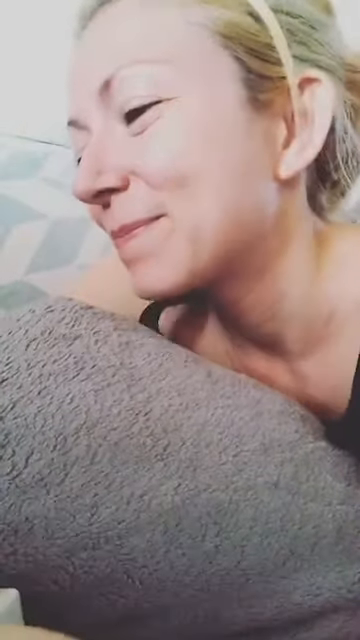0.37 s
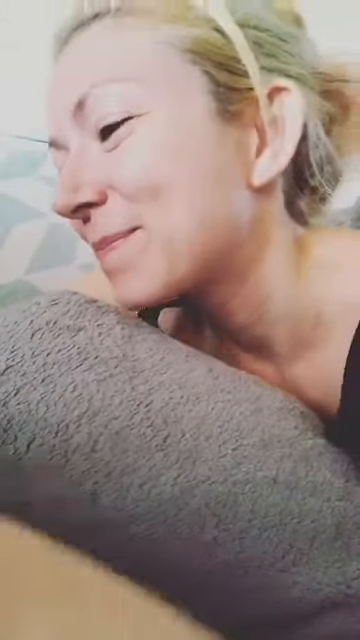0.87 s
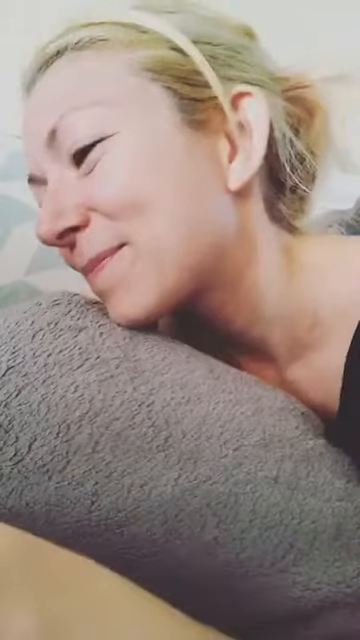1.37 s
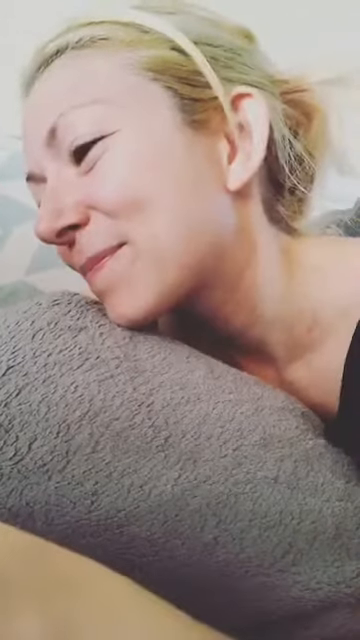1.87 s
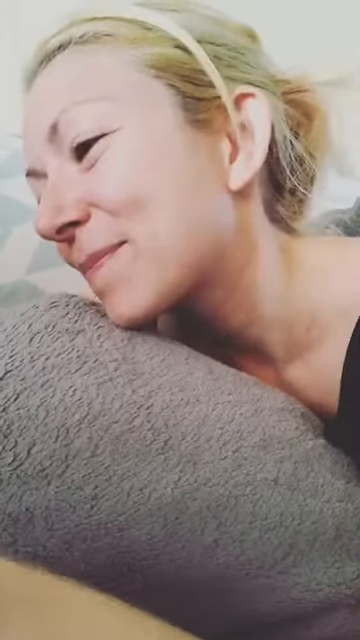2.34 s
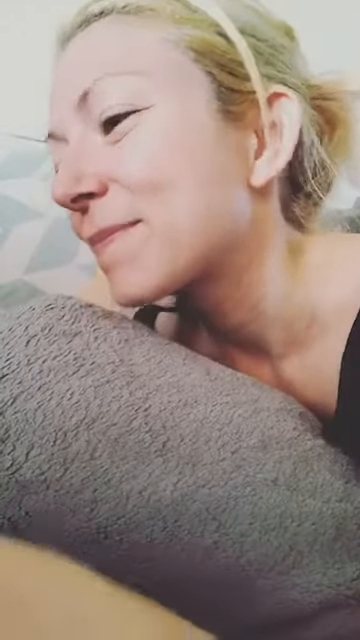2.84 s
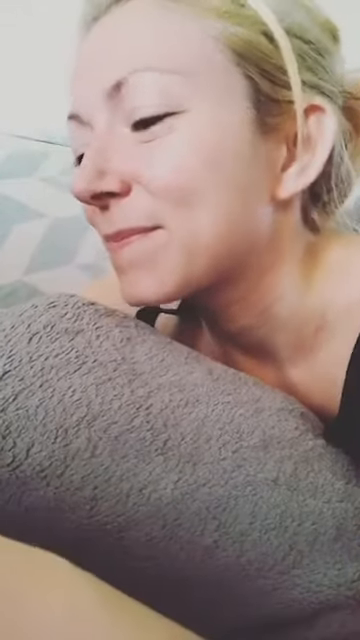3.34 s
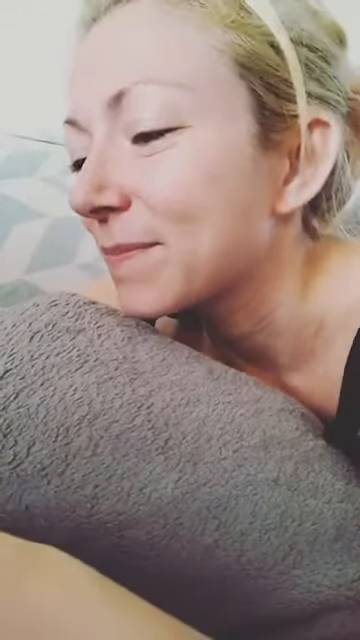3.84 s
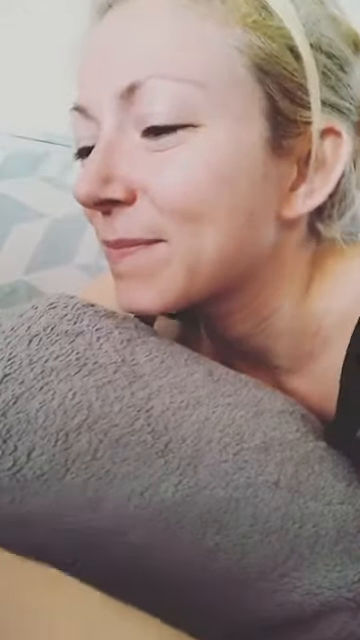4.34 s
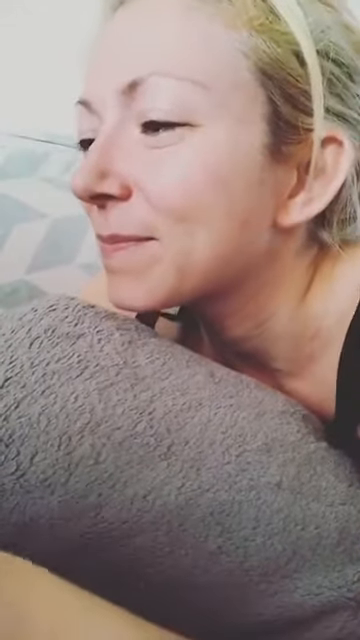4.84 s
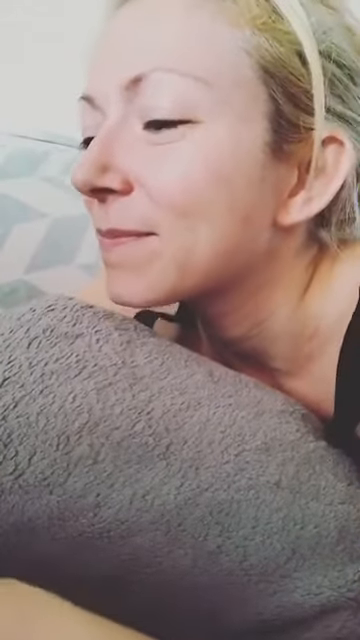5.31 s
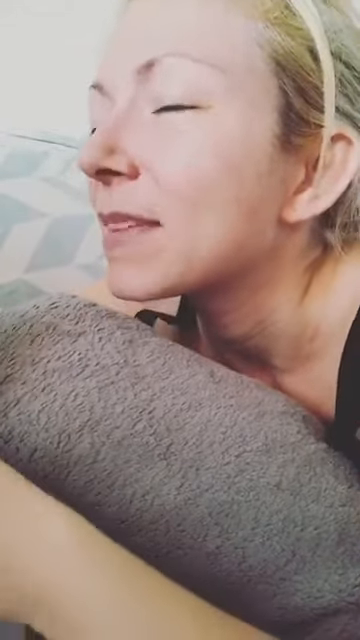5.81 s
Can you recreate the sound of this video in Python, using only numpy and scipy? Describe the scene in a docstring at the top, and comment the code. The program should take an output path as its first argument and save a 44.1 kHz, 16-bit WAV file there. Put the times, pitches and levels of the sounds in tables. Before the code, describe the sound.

Close phone-microphone sound of stiff cards being shuffled in a small, soft-furnished room, with a faint hiss and low rumble beneath. At about 0.1 to 0.2 seconds there is a short, dull cluster of taps with a hollow bump and a small puff of air. Near quiet follows, with barely audible rubbing. From 1.45 to 2.2 seconds a loud, dense riffle crackles by, its snaps uneven and strongest after 1.95, with low breathy gusts of displaced air. Papery sliding continues from 2.3 to 3.2, with a few light flicks. A second run, softer and looser, flutters from about 3.3 to 3.9 amid brushing strokes. After a pause, a tight cluster of contacts at 4.3 lands as one sharp, hollow knock. The rest, to about 6 seconds, is quiet: soft rubs, faint bumps between 4.6 and 5.1, and tiny clicks near 5.3. Reflections are short and dry.

```python
"""Stiff cards snap down in quick runs, amid rubbing, soft hollow knocks and low puffs of air, in a small soft room.
Snaps and random ticks are decaying noise exciting the modes of the deck and of the card edges.
Knocks are two damped sines; rubbing and puffs are coloured noise under stroke-like level curves.
A near wall and a short diffuse tail return the snaps and knocks; rumble and a faint hiss lie beneath."""
import sys
import numpy as np
from scipy import signal
from scipy.fft import rfft, irfft, next_fast_len
from scipy.io import wavfile
from scipy.ndimage import map_coordinates

SR = 44100
rng = np.random.default_rng(int(sys.argv[2]) if len(sys.argv) > 2 else 0)


def field_ratio(decibels):
    """Amplitude ratio for a level in dB (20 dB per decade); scalars and array-likes work."""
    return 10 ** (np.asarray(decibels, dtype=float) / 20)


def transcribe(u):
    """Save the signal u as a 16-bit wav file named by the first command-line argument.

    u: samples, shape (n,) or (channels, n), limited to [-1, 1]; the rate is SR.
    q: integer samples, one column per channel.
    """
    v = np.clip(np.atleast_2d(u).T, -1, 1)
    q = np.round(v * 32767).astype(np.int16)
    wavfile.write(sys.argv[1], SR, q)


N = 261943  # samples in the scene
SPAN = 4096  # samples given to each snap or knock

# packets of cards slapping the deck: t/s, ring peak level/dB, ring f/Hz,
# edge crack level/dB re ring, time to decay by 60 dB/s
SNAPS = [(.099, -41.5, 2200, -5, 0.002), (.1377, -18, 880, -30, 0.0057), (.152, -18, 910, -29, 0.023),
         (.1636, -18, 2540, -14.5, 0.011), (.209, -26.5, 905, -27, 0.019),
         (.2165, -26.5, 1330, -20, 0.0011), (.689, -41, 940, 6.5, .001), (1.183, -41.5, 2200, -6, .002),
         (1.4445, -25, 1770, -5, 0.017), (1.47, -14.5, 1580, -15, 0.011), (1.4887, -10.5, 3190, -22, 0.02),
         (1.5434, -18, 2360, -2, 0.0042), (1.5477, -13.5, 2200, -19, 0.015),
         (1.6014, -18.5, 1640, -9, 0.0021), (1.6126, -21, 1390, -14, 0.0027), (1.629, -19, 2570, 4, 0.0092),
         (1.643, -18.5, 2100, 3, 0.0023), (1.6468, -15, 1550, -13, 0.0022), (1.7026, -22, 1440, 1.5, .0007),
         (1.7423, -19.5, 2080, -17, 0.027), (1.7654, -18, 1500, -6, 0.0076),
         (1.7826, -24, 1540, -10, 0.022), (1.8215, -30, 1490, -8, 0.014), (1.8323, -22, 1010, -3, 0.014),
         (1.8415, -18.5, 953, -8.5, 0.0081), (1.856, -15, 1610, -8, 0.0024),
         (1.8675, -13.5, 2030, -11, 0.013), (1.9267, -32, 1500, -22, 0.0018),
         (1.9395, -26, 1570, -16, 0.0019), (1.9537, -16, 2430, -10, 0.031),
         (1.9632, -5, 2210, -5.5, 0.0019), (2.0054, -17, 1740, -1, 0.0027), (2.02, -7, 2280, -5.5, 0.0063),
         (2.048, -15.5, 1570, -10, 0.012), (2.0716, -11.5, 2500, -7.5, 0.0014),
         (2.093, -20, 2520, -6, 0.0058), (2.1047, -7.5, 2480, -8.5, 0.011),
         (2.1273, -7.5, 2530, -3.5, 0.0088), (2.1393, -13, 1660, -9, 0.011),
         (2.1498, -6.5, 1570, -16, 0.01), (2.161, -24, 2020, -12, 0.0056), (2.1888, -19, 2270, 9, .0013),
         (2.1986, -10, 1620, -4.5, 0.0013), (2.2092, -20.5, 2220, 10.5, 0.0097),
         (2.2139, -8, 2520, -10, 0.002), (2.2232, -24.5, 2010, 4, 0.013), (2.662, -41, 2200, -3, 0.001),
         (2.7671, -32, 1980, -1.5, .0042), (2.802, -25.5, 1950, -13, 0.0036),
         (2.9545, -29, 2060, -11, 0.0021), (3.098, -21, 2600, -8.5, 0.006),
         (3.2163, -24, 2070, -25, 0.0018), (3.2905, -32, 2270, 2, 0.015), (3.311, -16, 2800, -8, 0.0092),
         (3.339, -26, 2400, 0, 0.0051), (3.344, -19, 1580, -15, 0.0075), (3.3487, -12.5, 2990, -28, .0054),
         (3.3644, -17, 2280, -7.5, 0.0097), (3.4375, -22.5, 2010, -17, 0.015),
         (3.4439, -11, 1830, -6, 0.0049), (3.447, -11.5, 1870, -25, .01), (3.4783, -24, 1610, -1.5, 0.0033),
         (3.5178, -19, 2150, -29, .003), (3.541, -39, 2180, -21, 0.013), (3.552, -13, 2920, -22, 0.015),
         (3.5783, -22, 2280, -24, 0.0013), (3.6224, -24.5, 1540, -17, 0.019),
         (3.6507, -11, 2930, -21.5, 0.019), (3.7105, -23, 1890, -12, .01), (3.7768, -13.5, 1730, -25, .012),
         (3.8023, -27, 1880, -11, 0.017), (3.8755, -14, 2010, -15.5, 0.026),
         (3.946, -33.5, 1800, -9, 0.002), (3.987, -38, 3430, -5, 0.0017), (4.2917, -14.5, 1660, -19, 0.016),
         (4.31, -12, 940, -33, 0.0099), (4.3193, -11, 1480, -32, .0068), (4.3275, -9.5, 1850, -35, 0.0062),
         (4.334, -20, 2100, -34, 0.015), (4.3396, -8, 1450, -20.5, 0.016), (4.3493, -14, 2160, -36, 0.023),
         (4.355, -17.5, 1050, -33, 0.016), (4.5556, -37.5, 2520, -7.5, .0067),
         (4.5958, -43, 2160, -6, .0023), (4.719, -38, 1980, -7, 0.0018), (4.737, -35, 2170, -14, 0.0027),
         (5.3058, -36.5, 1620, -2.5, 0.0019), (5.334, -31, 2620, -1, 0.0016)]
# the deck bumping a hollow surface: t/s, low mode peak level/dB, upper mode peak level/dB
KNOCKS = [(0.129, -32, -33), (0.136, -50, -15), (0.145, -22, -18), (0.152, -55, -16.5), (0.21, -28.5, -25),
          (0.224, -27.5, -31), (4.294, -13.5, -25), (4.312, -13.5, -31), (4.319, -11, -13),
          (4.329, -26, -14.5), (4.335, -9, -14), (4.34, -15, -16.5), (4.35, -22, -15), (4.643, -42, -45),
          (4.664, -43, -44), (4.693, -41, -41), (4.764, -41.5, -40.5), (4.897, -37, -38),
          (4.915, -30.5, -39.5), (5.109, -42.5, -65)]
# strokes of card sliding on card or skin: middle t/s, held t/s, rub level/dB, edge hiss level/dB
STROKES = [(.52, 0.038, -62.5, -67.5), (.65, .08, -55, -69), (.765, 0.033, -60, -69),
           (1.489, .005, -29, -46), (1.639, .005, -32, -40), (1.76, .12, -44, -55),
           (1.859, 0.018, -41.5, -57), (2.022, 0.22, -46, -46), (2.18, 0.05, -31, -37),
           (2.27, 0.052, -59, -50.5), (2.365, 0.052, -46, -54.5), (2.438, 0.028, -42, -48.5),
           (2.592, 0.04, -46, -52), (2.682, 0.011, -49, -55.5), (2.79, 0.023, -53.5, -67),
           (3.0, 0.035, -48.5, -54.5), (3.075, 0.067, -41, -49.5), (3.155, .04, -41, -47.5),
           (3.25, 0.1, -40, -47), (3.362, 0.037, -42, -48), (3.456, 0.05, -38, -50),
           (3.561, 0.057, -41.5, -50), (3.67, 0.077, -42.5, -51.5), (3.792, 0.065, -42, -51),
           (3.898, 0.039, -41, -46.5), (4.03, 0.16, -59.5, -66), (4.332, 0.0029, -34.5, -46),
           (4.59, 0.03, -50.5, -62), (4.759, 0.078, -53, -66), (4.932, .05, -50, -53.5),
           (5.19, 0.023, -60, -64), (5.371, 0.083, -51.5, -59.5), (5.72, 0.36, -68, -66.5),
           (5.93, 0.026, -70, -56.5)]
# puffs of air pushed at the microphone by moving cards: middle t/s, held t/s, level/dB
PUFFS = [(0.184, 0.018, -27), (1.487, .03, -27), (1.64, 0.037, -29.5), (1.779, 0.048, -30),
         (1.863, 0.029, -27.5), (1.97, 0.022, -33), (2.08, 0.089, -31.5), (2.208, 0.028, -22.5),
         (2.63, 0.35, -45), (3.329, 0.024, -33.5), (3.62, 0.12, -43.5), (3.882, 0.043, -36.5),
         (4.33, .01, -32.5)]
# resonances of the deck: f/Hz, width/Hz, relative level/dB
DECK_MODES = [(917, 670, -5), (1640, 530, 1), (2520, 2000, -6), (3800, 6300, -13)]
# resonances that colour the edge crack: f/Hz, width/Hz, relative level/dB
CRACK_MODES = [(4450, 3760, 0.5), (5840, 556, 15.5), (9230, 2400, -9.5), (14170, 2200, -7)]
# the two modes of the hollow surface: f/Hz, width/Hz
HOLLOW_MODES = [(318, 53), (740, 320)]
# relative noise spectra of the rub, edge hiss, air puffs, low rumble and faint hiss: f/Hz, level/dB per Hz
RUB_SPECTRUM = [(180, -19.5), (300, -27.5), (630, -6.5), (946, -7), (1190, -11.5), (1830, -2.5), (2660, -4),
                (4800, -17.5), (6240, -44), (10600, -120)]
HISS_SPECTRUM = [(2500, -5), (4200, -7.5), (6100, 1.5), (7400, -11.5), (9500, -11), (11000, -20),
                 (16000, -13.5)]
PUFF_SPECTRUM = [(15, -7), (35, -5), (65, -5.5), (130, -9.5), (260, -18), (500, -56.5)]
RUMBLE_SPECTRUM = [(11, -52), (18, -5.5), (55, 0.5), (85, -13), (125, -6.5), (200, -19.5), (300, -42),
                   (500, -79)]
QUIET_SPECTRUM = [(120, -47), (250, -5), (550, -13.5), (800, -11.5), (2250, -11), (4520, -31), (5940, -34),
                  (10500, -45.5), (16000, -51)]
# what the near wall returns: f/Hz, level/dB
WALL_RETURN = [(300, -29), (1500, -14.5), (3000, -8), (5000, -28.5), (9000, 0.5), (15000, -5)]
# decay of the room's tail: f/Hz, t60/s
ROOM_T60 = [(200, 0.15), (2000, 0.1), (10000, 0.083)]

# a snap's low push: offset/dB, then dB per dB of the snap and of the air then moving
PUSH_DB, PUSH_PER_SNAP, PUSH_PER_PUFF = -3.5, 0.37, 0.53
# single cards catching: least level over the rub/dB, spread/dB, ring f/Hz, crack level/dB, decay time/s
TICK_DB, TICK_SCATTER_DB, TICK_HZ, TICK_CRACK_DB, TICK_S = 2, 4, 2100, -7, 0.0061
STROKE_RISE, STROKE_FALL = 394, 340  # dB per s
IDLE_RUB_DB, IDLE_HISS_DB = -67.5, -75  # fingers resting on the cards
PUFF_RISE, PUFF_FALL, STILL_AIR_DB = 340, 455, -53.5  # dB per s, dB per s, dB
# low part of the rub, then of the deck's ring: corner f/Hz, gain in still air/dB, dB per dB of moving air
FULL_HZ, FULL_DB, FULL_PER_PUFF = 1270, -9, 0.46
BODY_HZ, BODY_DB, BODY_PER_PUFF = 1500, -18.5, 0.81
TOP_HZ = 16300  # the microphone's upper -3 dB point


def snaps():
    """Impact excitation: a brief scatter of contacts rings the deck, cracks the card edges and squeezes out air."""
    events = np.vstack([SNAPS, ticks()])
    s, db, hz, crack_db, length = np.transpose(events)[:, :, None]
    air_db = air_level()[(s * SR).astype(int)]
    push_db = PUSH_DB + PUSH_PER_SNAP * db + PUSH_PER_PUFF * air_db

    t = np.arange(SPAN) / SR
    onset = 1 - np.exp(-t / (0.078 * length))
    scatter = rng.standard_normal((len(s), SPAN)) * onset
    contact = scatter * field_ratio(-60 * t / length)
    edges = scatter * field_ratio(-60 * t / (length + 0.0014))  # the edges settle a little later than the faces

    # slaps that move more air land fuller; half the gain, as the shelf is squared
    body = field_ratio((BODY_DB + BODY_PER_PUFF * (air_db - STILL_AIR_DB)) / 2)

    def ring_response(f):
        shelf = ((body * BODY_HZ + 1j * f) / (BODY_HZ + 1j * f)) ** 2
        bass_cut = (1j * f / (700 + 1j * f)) ** 3
        dulling = 1 / (1 + 1j * f / (2.05 * hz)) ** 4  # thick packets land duller
        packet = 1.53 * mode(f, hz, 340)  # the packet's thickness sets one mode
        return bass_cut * dulling * (shelf * modes(DECK_MODES)(f) + packet)

    ring = filtered(contact, ring_response)
    crack = filtered(edges, lambda f: modes(CRACK_MODES)(f) * 1j * f / (4000 + 1j * f))
    push = filtered(contact, lambda f: mode(f, 320, 765) ** 3)
    slap = field_ratio(db) * (peak(ring) + field_ratio(crack_db) * peak(crack))
    return placed(s[:, 0], slap + field_ratio(push_db) * peak(push))


def ticks(count=240):
    """Stick and slip: single cards catch at random, each tick's level following the rub at its moment."""
    when, size, tone, edge, short = rng.random((count, 5)).T
    rub_db = stroke_levels()[0][(when * N).astype(int)]
    db = rub_db + TICK_DB + TICK_SCATTER_DB * size
    hz = TICK_HZ * 1.24 ** (tone - 0.5)
    crack_db = TICK_CRACK_DB + 12 * (edge - 0.5)
    length = TICK_S * 4 ** (short - 0.5)
    return np.transpose([when * N / SR, db, hz, crack_db, length])


def knocks():
    """Damped free vibration: each soft bump rings the two modes of the hollow."""
    s, *levels = np.transpose(KNOCKS)[:, :, None]
    t = np.arange(SPAN)[None] / SR
    rise = 1 - np.exp(-t / 0.0018)
    total = 0
    for db, (hz, width) in zip(levels, HOLLOW_MODES):
        ring = rise * np.sin(2 * np.pi * hz * t) * np.exp(-np.pi * width * t)
        total = total + field_ratio(db) * peak(ring)
    return placed(s[:, 0], total)


def slide():
    """Friction noise: coated card rubs in grainy bursts, fuller in strokes that move more air."""
    rub_db, hiss_db = stroke_levels()
    stutter = wobble(80)
    grain = noise(RUB_SPECTRUM, grain_db=4.0, rate=210)
    low = filtered(grain, lambda f: 1 / (1 + (f / FULL_HZ) ** 6))
    full_db = FULL_DB + FULL_PER_PUFF * (air_level() - STILL_AIR_DB)
    rub = field_ratio(rub_db + 1.8 * stutter) * (grain - low + field_ratio(full_db) * low)
    hiss = field_ratio(hiss_db + 1.6 * stutter) * noise(HISS_SPECTRUM, grain_db=1.5, rate=300)
    return rub + hiss


def stroke_levels():
    """Energy input of sliding: the rub and hiss levels rise and fall with the same strokes."""
    middle, held, rub_db, hiss_db = np.transpose(STROKES)
    rub = swells(middle, held, rub_db, STROKE_RISE, STROKE_FALL, IDLE_RUB_DB)
    hiss = swells(middle, held, hiss_db, STROKE_RISE, STROKE_FALL, IDLE_HISS_DB)
    return rub, hiss


def air_level():
    """Displaced air: moving cards raise the level of the air above its still value."""
    return swells(*np.transpose(PUFFS), PUFF_RISE, PUFF_FALL, STILL_AIR_DB)


def air_puffs():
    """Turbulent pressure: moving air meets the microphone as flickering low noise."""
    return field_ratio(air_level()) * noise(PUFF_SPECTRUM, grain_db=5, rate=29)


def background():
    """Stationary noise: the low rumble of the house and a faint hiss keep fixed mean levels."""
    rumble = field_ratio(-44.5) * noise(RUMBLE_SPECTRUM, grain_db=1.9, rate=36)
    hiss = field_ratio(-56) * noise(QUIET_SPECTRUM, grain_db=-0.5, rate=36)
    return rumble + hiss


def room(x):
    """Reflection and reverberation: a smeared echo from the near wall, then a short dull diffuse tail."""
    t = np.arange(400) / SR
    smear = rng.standard_normal(400) * np.exp(-((t - 0.003) / 0.0021) ** 2)
    delayed = np.pad(smear / np.linalg.norm(smear), (round(0.0085 * SR), 0))
    echo = filtered(np.convolve(x, delayed)[:N], lambda f: field_ratio(along(WALL_RETURN, f)))

    # the tail is noise whose bands each decay at their own rate
    hz, t, z = signal.stft(rng.standard_normal(SR // 2), SR, nperseg=256)
    decay = field_ratio(-60 * t / along(ROOM_T60, hz)[:, None])
    tail = signal.istft(z * decay, SR, nperseg=256)[1]
    late = signal.fftconvolve(np.pad(x, (200, 0)), tail / np.linalg.norm(tail))[:N]
    return echo + field_ratio(-14.5) * late


def swells(middle, held, db, rise, fall, idle_db):
    """Addition of powers: events that rise, hold and fall sum over a resting level, in dB per sample."""
    t = np.arange(0, N + 64, 64) / SR
    late = t - middle[:, None]
    half = held[:, None] / 2
    loss = rise * np.maximum(-late - half, 0) + fall * np.maximum(late - half, 0)
    power = field_ratio(idle_db) ** 2 + np.sum(field_ratio(db[:, None] - loss) ** 2, axis=0)
    return np.interp(np.arange(N) / SR, t, 10 * np.log10(power))


def noise(spectrum, grain_db, rate):
    """Modulated random noise: its strength flickers, a spectrum colours it, and its rms is set to 1."""
    raw = rng.standard_normal(N) * field_ratio(grain_db * wobble(rate))
    return unit(filtered(raw, lambda f: field_ratio(along(spectrum, f))))


def wobble(rate):
    """Band-limited fluctuation: a smooth curve through random knots, rate of them a second."""
    knots = rng.standard_normal(int(N * rate / SR) + 4)
    return map_coordinates(knots, [np.arange(N) * rate / SR])


def mode(f, hz, width):
    """Simple resonator: the response of one causal, damped mode."""
    return 1j * f * width / (hz * hz - f * f + 1j * f * width + 1e-9)


def modes(table):
    """Modal superposition: resonances of alternating sign add up to one response."""
    return lambda f: sum((-1) ** k * field_ratio(db) * mode(f, hz, w) for k, (hz, w, db) in enumerate(table))


def filtered(x, response):
    """Linear filtering: the spectrum of x is multiplied by a complex response of frequency."""
    m = next_fast_len(x.shape[-1] * 2)
    return irfft(rfft(x, m) * response(np.fft.rfftfreq(m, 1 / SR)), m)[..., :x.shape[-1]]


def along(points, hz):
    """Logarithmic frequency scale: (f/Hz, value) points are interpolated on a log axis."""
    f, v = np.transpose(points)
    return np.interp(np.log(hz + 1), np.log(f + 1), v)


def unit(x):
    """Normalisation of power: x is scaled to rms 1."""
    return x / np.sqrt(np.mean(x ** 2) + 1e-20)


def peak(rows):
    """Normalisation of amplitude: each row is scaled to peak 1."""
    return rows / np.abs(rows).max(axis=1, keepdims=True)


def placed(times, rows):
    """Superposition in time: rows of sound are added together at their times."""
    at = np.round(times * SR).astype(int)[:, None] + np.arange(SPAN)
    return np.bincount(at.ravel(), rows.ravel(), N + SPAN)[:N]


def scene():
    """Superposition of sources: snaps and knocks with their room, then rubbing, puffs and background."""
    hits = snaps() + knocks()
    return (hits + room(hits) + slide() + air_puffs() + background())[None]


def top_cut(x):
    """Nothing passes above the cut-off."""
    return signal.sosfilt(signal.butter(12, 17010, fs=SR, output="sos"), x)


def record(dry):
    """Limited bandwidth: the phone's microphone fades out steeply at the top."""
    heard = filtered(dry, lambda f: 1 / np.sqrt(1 + (f / TOP_HZ) ** 50))
    return top_cut(heard)


dry = scene()
out = record(dry)
transcribe(out)
```